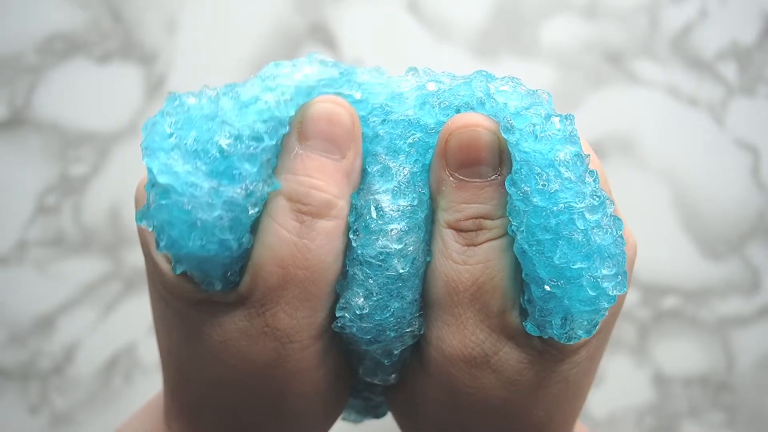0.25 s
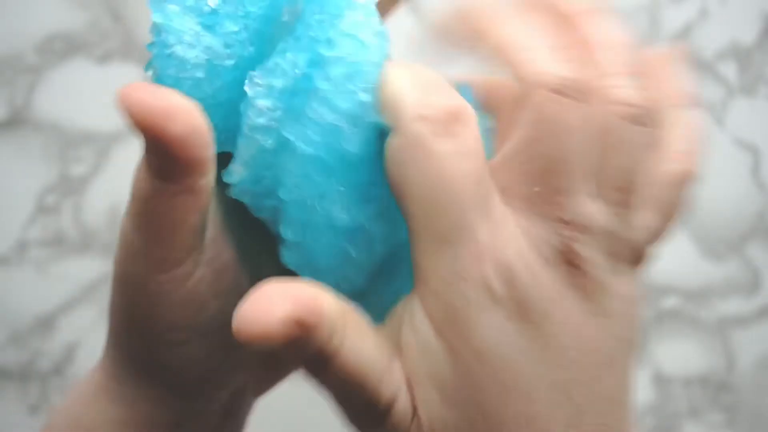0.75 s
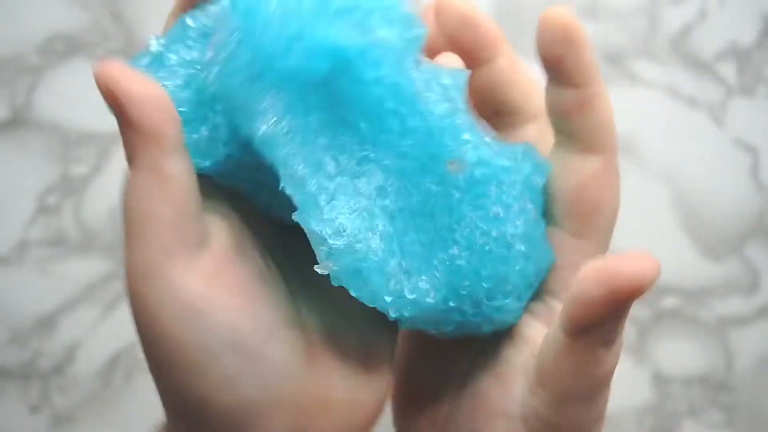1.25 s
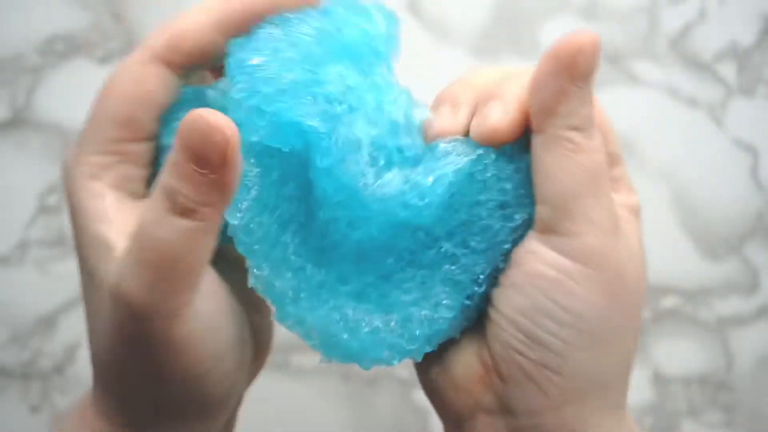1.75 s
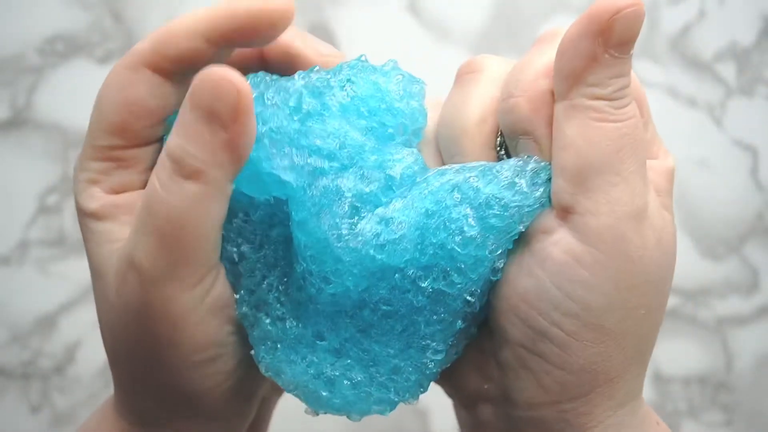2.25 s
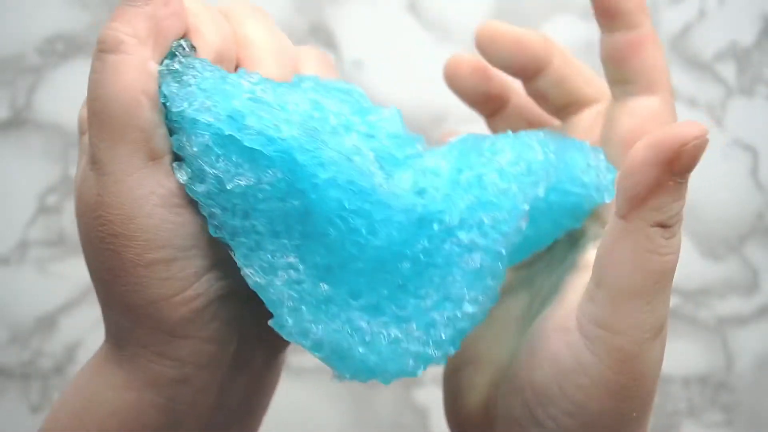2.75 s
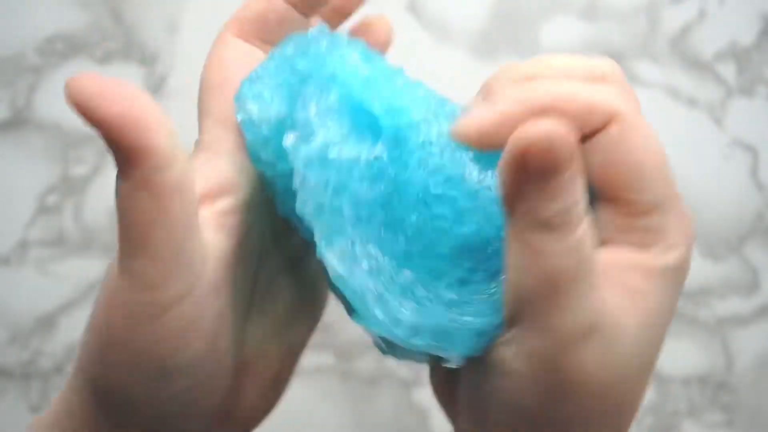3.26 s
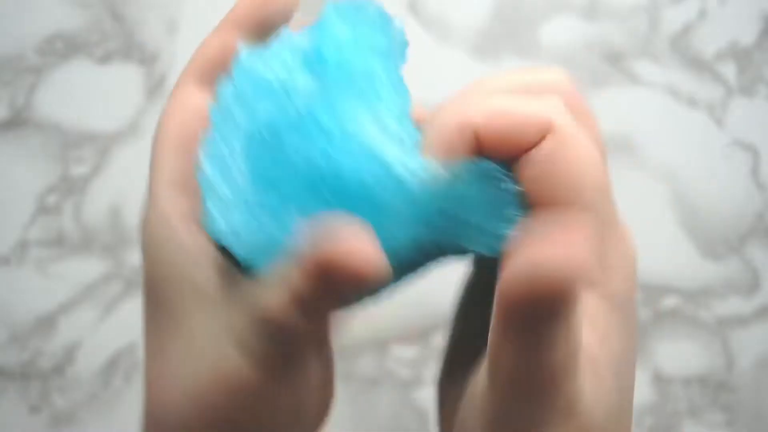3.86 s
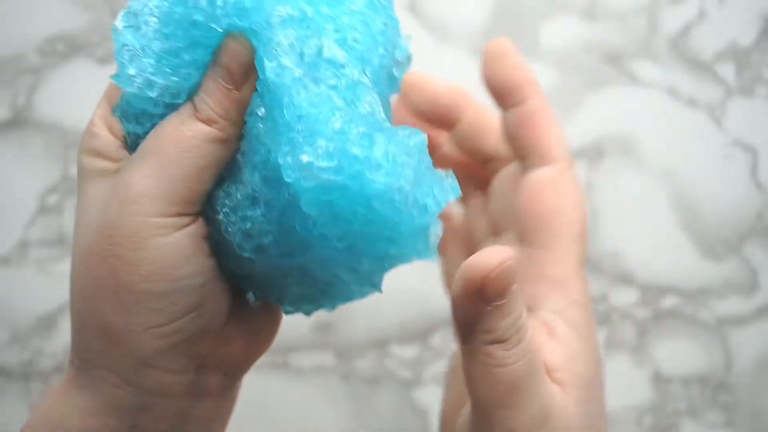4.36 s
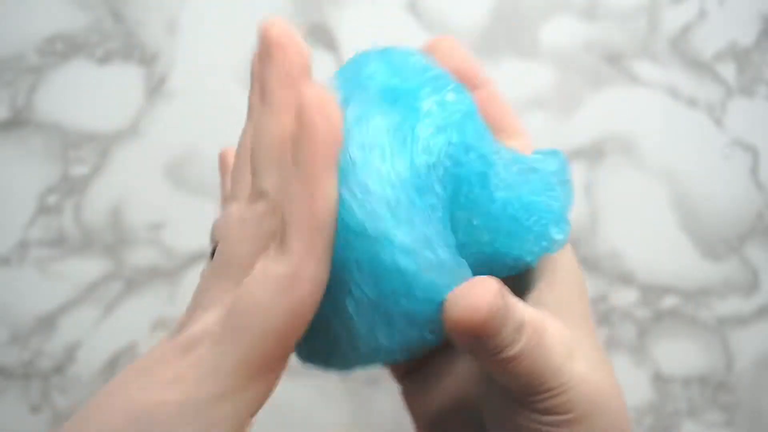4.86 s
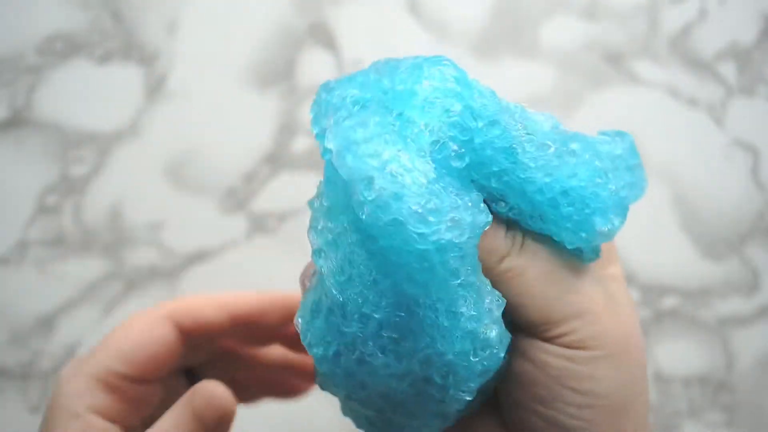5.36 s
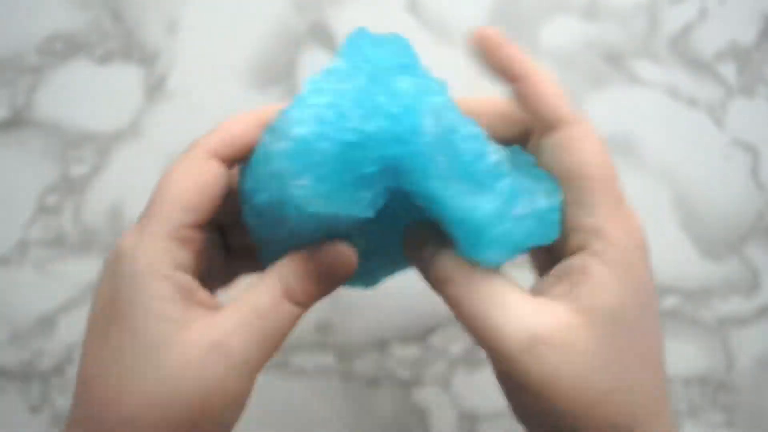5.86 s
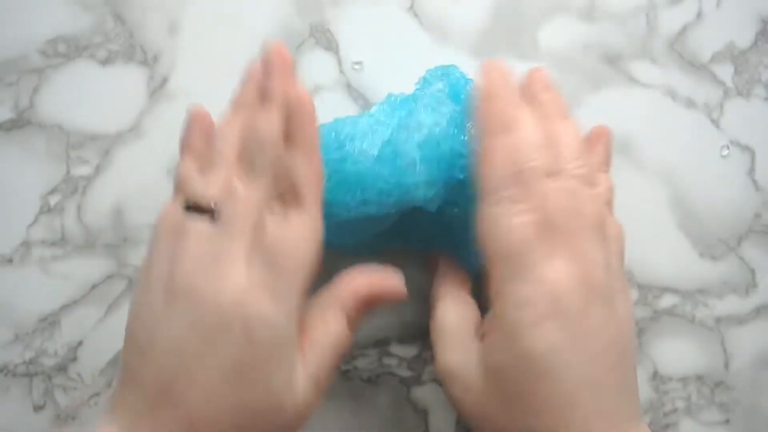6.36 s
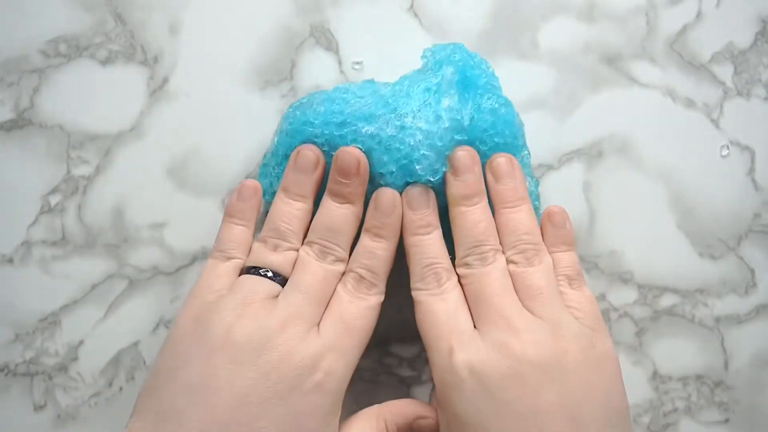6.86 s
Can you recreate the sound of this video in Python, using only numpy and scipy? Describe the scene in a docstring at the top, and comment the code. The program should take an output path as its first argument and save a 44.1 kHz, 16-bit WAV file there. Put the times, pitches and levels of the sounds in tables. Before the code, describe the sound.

Wet, gritty crackling rises and falls with uneven squeezes, made of countless tiny bubble bursts and fizzing clicks. Larger air pockets snap crisply or tear out in short squirts, strongest between about two and four seconds. Quieter lulls separate the strokes, and the last presses onto a hard counter sound softer, with a slight hollow ring. Close stereo pickup, short room reflections, faint low rumble and hiss.

```python
"""A stone counter in a small quiet room: two hands squeeze, fold and press a bead-filled slime near a stereo microphone.
Trapped air pockets snap open as clicks coloured by their cavities, or tear out in squirts of many tiny ruptures.
Between the beads, clusters of random clicks crackle and small bubbles ring, following the strokes of the hands.
Echoes, fading noise and faint ringing tones give the sounds their tails; dull thuds and room air are added dry."""
import sys
import numpy as np
from scipy import signal
from scipy.fft import rfft, irfft
from scipy.io import wavfile
from scipy.ndimage import uniform_filter1d

SR = 44100
rng = np.random.default_rng(int(sys.argv[2]) if len(sys.argv) > 2 else 0)


def bounce(signal):
    """Save signal as a 16-bit WAV file at the path given by the first command-line argument."""
    frames = np.transpose(np.atleast_2d(signal))
    limited = np.clip(frames, -1, 1)
    pcm = np.round(limited * 32767).astype(np.int16)
    wavfile.write(sys.argv[1], SR, pcm)


N = 313551
TIME = np.arange(N) / SR


def undb(db):
    """Turn decibels into a gain."""
    return 10 ** (np.asarray(db) / 20)


def unit(x):
    """Scale to an rms (average strength) of 1."""
    return x / np.sqrt(np.mean(x ** 2) + 1e-20)


def curves(table):
    """Join the columns of a table by straight lines in time."""
    s, *columns = np.transpose(table)
    return [np.interp(TIME, s, column) for column in columns]


def colour(x, points, size=512):
    """Filter through (frequency [Hz], level [dB]) points without pre-echo, so that clicks keep a sharp front."""
    hz, db = np.transpose(points)
    bins = np.maximum(np.arange(size // 2 + 1) * SR / size, 1)
    gain = undb(np.interp(np.log(bins), np.log(hz), db))
    # folding the cepstrum onto its first half gives the filter with the earliest energy
    cepstrum = irfft(np.log(gain))
    cepstrum[1:size // 2] *= 2
    cepstrum[size // 2 + 1:] = 0
    response = irfft(np.exp(rfft(cepstrum)))
    return signal.fftconvolve(x, response)[:len(x)]


def resonance(x, hz, width_hz):
    """Let one band through, with gain 1 at its centre, like a ringing cavity."""
    centre_hz = min(hz, SR / np.e)  # stays safely below half the sample rate
    b, a = signal.iirpeak(centre_hz, Q=hz / width_hz, fs=SR)
    return signal.lfilter(b, a, x)


def hump(hz, octaves):
    """Broad response of a soft, heavily damped cavity, as (frequency [Hz], level [dB]) points."""
    bands = np.geomspace(50, SR / 2, num=60)
    distance = np.log2(bands / hz) / octaves
    return np.c_[bands, -12 * np.log10(1 + distance ** 4 / 2)]


def clicks(count, rate, spread_db):
    """Random clicks of uneven size and either sign, about `rate` a second, with mean power 1."""
    there = rng.random(count) < rate / SR
    size = undb(spread_db * np.minimum(rng.standard_exponential(count), 4.5))
    sign = rng.choice([-1, 1], count)
    # dividing by the root of the rate keeps busy and sparse stretches equally strong
    return unit(there * size * sign / np.sqrt(rate))


def clumps(count, depth_db, size):
    """A wandering gain, smoothed over `size` samples, so that ruptures come in clumps."""
    wander = uniform_filter1d(rng.standard_normal(count), size=size)
    return undb(depth_db * unit(wander))


def add(track, s, sound):
    """Mix a sound into a track at time s."""
    start = max(int(s * SR), 0)
    part = sound[:max(N - start, 0)]
    track[start:start + len(part)] += part


def film_break(t, rip_db, rip_s):
    """A film breaks with one click, then a burst of noise fades as its rim rips on."""
    return (t == 0) + undb(rip_db) * rng.standard_normal(len(t)) * np.exp(-t / rip_s)


def snap(level_db, hz, treble_db, cavity_db=2, rip_db=-10, rip_s=0.00015, size=1024):
    """A breaking film excites the cavity behind it, which adds a short ring to the crack."""
    push = film_break(np.arange(size) / SR, rip_db, rip_s)
    top_db = 0.77 * treble_db + 13.5
    crack = colour(push, [(80, -36.0), (450, -21.0), (1500, -2.5), (6000, 3.5),
                          (10000, top_db), (15000, 1.07 * top_db - 7.0)])
    ring = resonance(crack, hz, hz / 3)
    return unit(unit(crack) + undb(cavity_db) * unit(ring)) * undb(level_db)


def snaps(level_db=-9.0):
    """Air pockets open singly, each with its own time, pitch and brightness."""
    # pockets: (time [s], level before the shared gain [dB], cavity pitch [Hz], treble setting [dB])
    pockets = [(0.076, -48.5, 4270, -18), (0.106, -41, 11500, -9), (0.346, -29, 3530, -29),
               (0.392, -25, 7400, -14), (0.406, -29.5, 2120, -3), (0.422, -31, 1760, 4),
               (0.682, -36, 2720, -19), (1.687, -40, 2630, 0), (1.172, -32, 6900, -3),
               (1.51, -42.5, 5400, -11), (1.804, -33.5, 2220, -47), (1.899, -19.5, 3800, -20),
               (2.014, -31.5, 9000, -10), (2.081, -9, 3700, -1), (2.0832, -15, 1700, 7),
               (2.0865, -16, 5500, 0), (2.108, -24, 2400, -5), (2.281, -27, 5600, -25),
               (2.397, -38, 1920, -7), (2.505, -30, 10300, -5), (2.515, -22, 6940, -2),
               (2.531, -29.5, 4120, 3), (2.538, -27.5, 2980, -24), (2.561, -31, 4200, -21),
               (2.569, -16, 4130, -4), (2.604, -26.5, 4170, 8), (2.634, -15.5, 10400, -10.5),
               (2.696, -42, 2480, -27), (2.728, -23, 10200, -18), (2.768, -26.5, 9750, -13),
               (2.798, -20.5, 11100, -14), (2.815, -26, 9900, 5), (2.848, -28, 10700, -19),
               (2.903, -33, 2580, 1), (2.922, -28.5, 10800, -9), (2.939, -14.5, 5070, -3),
               (3.143, -32, 2960, -9), (3.189, -29, 10100, -2), (3.206, -18.5, 5470, -7),
               (3.241, -26.5, 5160, -21), (3.277, -31, 9600, -11), (3.306, -20.5, 11100, -8),
               (3.323, -26, 3870, 6), (3.376, -25.5, 9900, -9), (3.444, -33.5, 10200, -18),
               (3.525, -30.5, 9900, -7), (3.536, -34, 10600, -19), (3.57, -21, 11600, -16.5),
               (3.607, -31.5, 9510, -15), (3.679, -29.5, 11700, -4.5), (3.912, -32.5, 8400, -22),
               (4.65, -27, 9340, -10), (5.046, -38.5, 5700, -19), (5.31, -38.5, 2310, -8),
               (5.761, -27.5, 7800, -13), (6.169, -43, 1370, -1), (6.402, -37, 5300, -6),
               (6.57, -36.5, 7800, -15), (6.608, -34, 7350, -31), (6.621, -31.5, 1900, 8),
               (6.873, -34.5, 8740, -13), (6.918, -32.5, 6000, -9), (7.025, -30.5, 9600, -11)]
    out = np.zeros(N)
    for s, *pocket in pockets:
        add(out, s + .001, snap(*pocket))  # heard 1 ms after the table time
    return out * undb(level_db)


def pops(level_db=-9.5, rip_db=-14, rip_s=0.00083, size=1024):
    """One breaking film makes two joined air chambers ring together."""
    # double pockets: (time [s], level before the shared gain [dB], large chamber [Hz],
    #                  small chamber [Hz], small chamber against the large one [dB])
    double_pockets = [(0.989, -44, 1640, 3460, -4), (1.283, -41.5, 2230, 3400, -13),
                      (4.124, -32.5, 2480, 4070, 2.5), (4.214, -24, 2320, 4630, 13),
                      (6.092, -30, 1870, 3410, 7.5), (6.097, -29.5, 2150, 5450, 2)]
    out, t = np.zeros(N), np.arange(size) / SR
    for s, db, large_hz, small_hz, small_db in double_pockets:
        push = film_break(t, rip_db, rip_s)
        large, small = (unit(resonance(push, hz, hz / 4.5)) for hz in (large_hz, small_hz))
        both = unit(large + undb(small_db) * small)
        add(out, s + .001, undb(db + level_db) * both)  # heard 1 ms after the table time
    return out


def kneading():
    """Add the strokes up into effort [dB] and the levels of wet and fine films [dB], led by the strongest stroke."""
    # strokes of the hands: (time of firm grip [s], build-up [s], hold [s], effort [dB],
    #                        large wet films [dB], finest films [dB]), both films against the effort
    strokes = [(0.345, 0.083, 0.13, -45, -7.5, -5), (0.475, 0.073, 0.013, -43.5, -6, 0.5),
               (0.579, 0.29, 0.11, -42.5, -6, -7), (0.769, 0.16, 0.13, -55.5, -7.5, -9),
               (0.92, 0.2, 0.092, -61, 6, -5.5), (1.18, 0.23, 0.21, -56.5, -1, -6),
               (1.548, 0.12, 0.018, -48.5, -3.5, -5.5), (1.659, 0.13, 0.072, -56, -3, -6.5),
               (1.839, 0.17, 0.15, -48.5, -1, -6), (2.03, 0.038, 0.12, -42.5, -1.5, -9.5),
               (2.23, 0.18, 0.12, -51, -6.5, -15), (2.37, 0.21, 0.082, -47.5, -4, -3.5),
               (2.519, 0.086, 0.067, -45, -8, -8), (2.732, 0.3, 0.23, -47, -3.5, -3),
               (3.073, 0.081, 0.078, -41, -7, -8.5), (3.198, 0.091, 0.15, -46.5, -5.5, -5),
               (3.438, 0.21, 0.19, -48.5, -9.5, -3), (3.805, 0.11, 0.1, -45, -3.5, -5.5),
               (3.991, 0.09, 0.43, -60, -1, -4), (4.575, 0.055, 0.04, -48.5, -7, -10),
               (4.65, 0.13, 0.01, -40, -9, -3), (4.885, 0.079, 0.33, -57.5, -14, -6),
               (5.278, 0.44, 0.11, -53, -2.5, -1), (5.596, 0.053, 0.068, -44, -10.5, -7),
               (5.687, 0.25, 0.12, -51.5, -6.5, -3), (5.87, 0.068, 0.35, -63, -8, -6),
               (6.121, 0.12, 0.048, -55, -1.5, -4.5), (6.278, 0.049, 0.0089, -58.5, -1, -3),
               (6.545, 0.076, 0.021, -48.5, -3.5, -14.5), (6.623, 0.051, 0.045, -48, -4, -5.5),
               (6.765, 0.22, 0.072, -46, -4, -13), (6.881, 0.043, 0.067, -49.5, -2, -12),
               (6.99, 0.076, 0.048, -49.5, -6, -12), (7.06, 0.17, 0.035, -46, -3.5, -13)]
    swell_db, ease_db_per_s, relax_db_per_s = 21, 6, 309.5  # before the grip, after it, after the hold
    rest_db = -73.5  # the slime never quite rests in the hands
    start, build, held, db, wet, fine = np.transpose(strokes)
    t = TIME[::64]
    since = t - start[:, None]
    drop = swell_db * np.maximum(-since, 0) / build[:, None]
    drop += ease_db_per_s * np.maximum(since, 0)
    drop += relax_db_per_s * np.maximum(since - held[:, None], 0)
    power = undb(db[:, None] - drop) ** 2
    total = power.sum(axis=0) + undb(rest_db) ** 2
    return curves(np.c_[t, 10 * np.log10(total), wet @ power / total, fine @ power / total])


def strays(count=190, level_db=-6, spread_db=8, low_hz=2000, octaves=1.77, treble_db=-15):
    """Small pockets snap at random times, louder under a harder squeeze."""
    out, effort_db = np.zeros(N), kneading()[0]
    for when, pitch, strength in rng.random((count, 3)):
        db = effort_db[int(when * N)] + level_db + spread_db * (strength ** 2 - 1)
        add(out, when * N / SR, snap(db, low_hz * 2 ** (octaves * pitch), treble_db))
    return out


def squirts(size=8192):
    """Air tears out of a fold: a rush of tiny ruptures swells and dies away."""
    # folds: (time [s], level at the top before the last colouring [dB], rise [s], fall [s],
    #         centre [Hz], width [octaves])
    folds = [(0.336, -41.5, 0.0091, 0.0055, 3900, 0.65), (0.476, -38, 0.0082, 0.019, 4500, 1.1),
             (1.176, -40.5, 0.0018, 0.0046, 2600, 7), (1.853, -26.5, 0.003, 0.0096, 1240, 0.99),
             (1.902, -34, 0.0013, 0.024, 3880, 2.2), (2.037, -27.5, 0.0018, 0.0038, 4400, 0.62),
             (2.082, -18.5, 0.00044, 0.0046, 2570, 1.63), (2.088, -20.5, 0.023, 0.021, 6290, 1.24),
             (2.734, -25, 0.0054, 0.0018, 5640, 0.48), (2.799, -28, 0.0014, 0.0052, 10000, 0.35),
             (2.939, -17.5, 0.0018, 0.0024, 5500, 1.03), (3.557, -38, 0.0024, 0.006, 8000, 0.62),
             (5.762, -27, 0.0031, 0.0033, 5370, 1), (6.091, -41, 0.0014, 0.022, 3150, 0.7)]
    out, t = np.zeros(N), np.arange(size) / SR
    for s, db, rise, fall, hz, octaves in folds:
        ruptures = clicks(size, rate=3500, spread_db=2.5) * clumps(size, 2.8, size=90)
        rush = unit(colour(ruptures, hump(hz, octaves)))
        swell = np.minimum(t / rise, np.exp(np.minimum(rise - t, 0) / fall))
        add(out, s, undb(db) * rush * swell)
    return colour(out, [(200, -4.5), (450, 0.0), (900, 6.5), (6000, 3.5), (10500, 7.5),
                        (12500, -15.5), (16000, -6)])


def crackle(wet_db=-1, crisp_db=0, fizz_db=6.0):
    """Films between the beads burst in little clusters, faster and louder under a harder squeeze."""
    # colour of the large wet films: (frequency [Hz], level [dB])
    wet_colour = [(100, -38), (280, -32), (560, -17), (800, -7), (1300, -7.5), (1900, -2), (2600, -9.5),
                  (6000, -37.5)]
    # colour of the middle-sized crisp films: (frequency [Hz], level [dB])
    crisp_colour = [(1000, -23), (2200, 6), (3300, 9), (5200, 8.5), (7500, 7), (9500, -30), (16000, -51)]
    # colour of the finest, fizzing films: (frequency [Hz], level [dB])
    fizz_colour = [(3000, -30.5), (6500, -4), (8500, -0.5), (10200, -0.5), (12500, -7), (16000, -9.5)]
    effort, wet, fizz = kneading()
    rate = 1100 * undb(0.67 * (effort + 53))  # ruptures per second
    clusters = clumps(N, depth_db=2.5, size=200)
    shared = clicks(N, rate=0.37 * rate, spread_db=1.5)
    out = 0
    for points, db in ((wet_colour, wet + wet_db), (crisp_colour, crisp_db), (fizz_colour, fizz + fizz_db)):
        # some ruptures are heard across all sizes of film, others in only one
        own = clicks(N, rate=rate, spread_db=3.5)
        films = clusters * (0.31 * shared + own)
        out = out + undb(effort + db) * unit(colour(films, points))
    return out


def bubbles(count=1200, size=512, level_db=0, spread_db=15, cycles=3.25, glide_per_s=40):
    """Small wet cavities ring for a few cycles, each at its own pitch, which rises as they open."""
    out, t = np.zeros(N), np.arange(size) / SR
    effort_db = kneading()[0]
    for when, pitch, strength in rng.random((count, 3)):
        hz = 1400 * 5 ** pitch
        # higher bubbles start louder but ring more briefly
        db = effort_db[int(when * N)] + level_db + spread_db * strength ** 2 + 7 * pitch
        tone = np.sin(2 * np.pi * hz * t * (1 + glide_per_s * t / 2))
        add(out, when * N / SR, undb(db) * tone * np.exp(-t * hz * 2 / cycles))
    return out


def squish():
    """Pressing collapses larger pockets deep inside, muffled by the slime around them."""
    # presses of palms and fingers: (time at the firmest [s], level [dB], half length [s])
    presses = [(1.179, -54.5, 0.0059), (1.865, -45, 0.0071), (3.835, -65, 0.028), (4.529, -58.5, 0.007),
               (4.641, -61, 0.037), (5.643, -70.5, 0.24), (6.552, -59, 0.016), (6.87, -64, 0.13)]
    pressure = sum(undb(db) * np.exp(-((TIME - s) / half) ** 2 / 2) for s, db, half in presses)
    muffle = [(150, -23.0), (260, 2.0), (340, -3.5), (430, 6), (600, -6.0), (1500, -15.0)]
    return pressure * unit(colour(clicks(N, rate=1200, spread_db=-4), muffle))


def channel(width_hz=520):
    """Crackle rings a narrow air channel, whose pitch mostly sinks as it lengthens when the fingers let go."""
    # air channel: (time [s], pitch [Hz], level [dB])
    glide = [(.36, 2360, -51), (.385, 2130, -42.5), (.415, 1950, -41), (.44, 1800, -43), (.50, 1700, -49),
             (.60, 1800, -62), (.69, 1780, -47), (.71, 1710, -87)]
    hz, db = curves(glide)
    # a rotating reference lets one fixed resonance follow the moving pitch
    turn = np.exp(2j * np.pi * np.cumsum(hz) / SR)
    pole = np.exp(-np.pi * width_hz / SR)
    ring = signal.lfilter([1], np.poly([pole, pole]), clicks(N, rate=450, spread_db=1.5) / turn)
    sounding = (TIME > glide[0][0]) * (TIME < glide[-1][0])
    return unit((ring * turn).imag) * undb(db) * sounding


def thuds(decay_s=0.000063, size=1024):
    """Three of the strong snaps give the air a short, dull push at their onset, which dies away at once."""
    # pushes: (time [s], level [dB])
    pushes = [(2.081, -33), (2.940, -24.5), (3.307, -19)]
    out, t = np.zeros(N), np.arange(size) / SR
    for s, db in pushes:
        add(out, s, undb(db) * np.exp(-t / decay_s))
    return out


def rings(x):
    """The counter and room hang on in faint tones, stronger once the lump lies on the counter."""
    # ringing tones: (pitch [Hz], time to fade by 60 dB [s], level while the lump is held up [dB],
    #                 level once it lies on the counter [dB])
    tones = [(275, 0.43, -3, 10.5), (786, 0.27, 5.5, 10), (1254, 0.041, -20, 5), (1710, 0.22, -13.5, -6),
             (2220, 0.095, -2, 5.5)]
    lying = TIME > 5.9  # set down at this time [s]
    out = 0
    for hz, t60, held_db, lying_db in tones:
        drive = x * np.where(lying, undb(lying_db), undb(held_db))
        out = out + resonance(drive, hz, np.log(1000) / (np.pi * t60))
    return out


def path(echo_s=0.0026, echo_db=-9, near_db=-4, near_t60=0.043, far_db=-9, far_t60=0.15, size=8192):
    """From one spot to both microphone ports: direct sound, counter bounce, scatter from the hands, then walls."""
    # resonances of the left microphone port: (centre [Hz], width [Hz])
    port_modes = [(7000, 1800), (15900, 1850)]
    t = np.arange(size) / SR
    height, angle = rng.uniform(-1, 1, 2)
    tail = sum(undb(db) * unit(undb(-60 * t / t60) * (t > .001))
               for db, t60 in ((near_db, near_t60), (far_db, far_t60)))
    # the scatter is most alike at both ports near 1500 Hz, less below and above
    common = colour(rng.standard_normal(size), [(300, -5.5), (1500, -1.0), (5000, -5.5)])
    scatter = [unit(common + rng.standard_normal(size)) * tail / np.sqrt(size) for _ in range(2)]
    tone = [(1500, -2.5), (7000, 1.5), (11000, -3.0), (16000, -8.5)]
    left, right = (colour(s, tone) for s in scatter)
    for port in (left, right):
        port[0] += 1  # direct sound
        port[int(echo_s * (1 + .3 * height) * SR)] += undb(echo_db)
    # the left port turns the phase around resonances that shift with the angle of arrival
    for hz, width_hz in port_modes:
        left = left - 2 * resonance(left, hz * (1 + .13 * angle), width_hz)
    return np.array([left, right])


def room(x, count=8, size=1100):
    """The breaking jumps between spots on the lump, each with its own path; the ringing is common to all."""
    spot = np.repeat(rng.integers(count, size=N // size + 1), size)[:N]
    out = rings(x)
    for k in range(count):
        here = x * uniform_filter1d(1. * (spot == k), size=32)  # short crossfades
        out = out + signal.oaconvolve(here[None], path(), axes=1)[:, :N]
    return out


def air(level_db=-60):
    """Low rumble and faint hiss of the quiet room: coloured noise, partly shared by both sides."""
    # colour of the still air: (frequency [Hz], level [dB])
    air_colour = [(12, -23.5), (20, 5.5), (56, -4), (802, -20), (1370, -19), (9400, -30), (14700, -40.5),
                  (16000, -28)]
    common, left, right = (unit(colour(rng.standard_normal(N), air_colour, size=8192)) for _ in range(3))
    return undb(level_db) * unit(0.29 * common + np.array([left, right]))


def scene():
    """Put the slime in its room; the dull thuds reach the microphone dry."""
    crunch = undb(-3.0) * (crackle() + bubbles())
    slime = snaps() + pops() + strays() + squirts() + crunch + squish() + channel()
    return room(slime) + thuds() + air()


def record(dry):
    """The left port is weaker in the mids; both ports clip at full scale, then the top is cut."""
    left = colour(dry[0], [(100, 0), (700, -2), (2000, -3.5), (4500, -.5), (15000, -.5)])
    ports = np.clip([left, dry[1]], -1, 1)
    top_hz = 15900
    steep_cut = signal.ellip(8, .2, 70, top_hz, fs=SR, output="sos")
    return signal.sosfilt(steep_cut, ports)


dry = scene()
out = record(dry)
bounce(out)
```